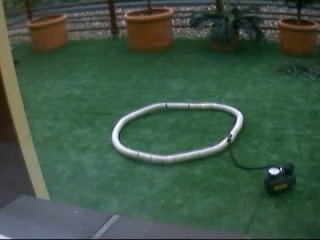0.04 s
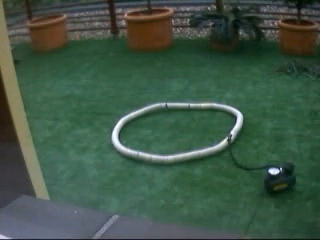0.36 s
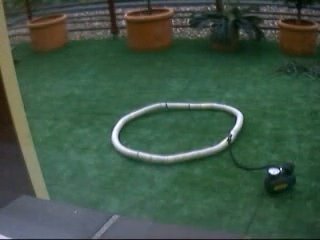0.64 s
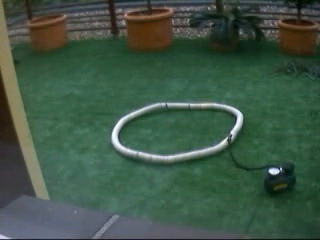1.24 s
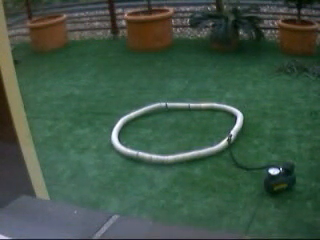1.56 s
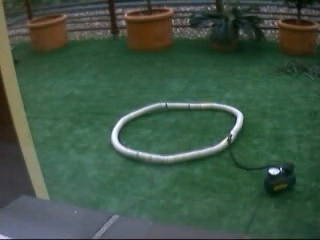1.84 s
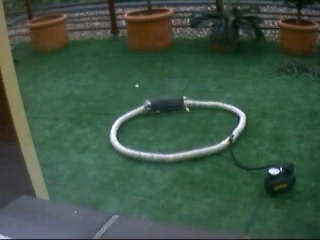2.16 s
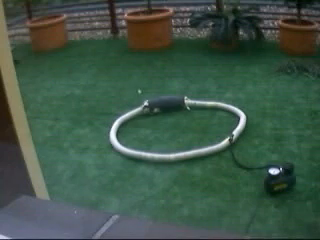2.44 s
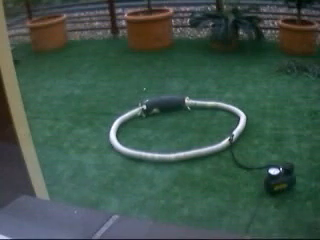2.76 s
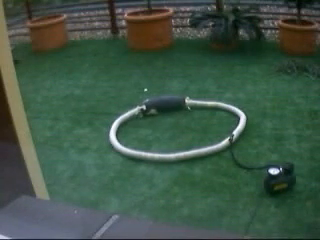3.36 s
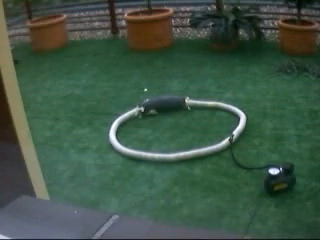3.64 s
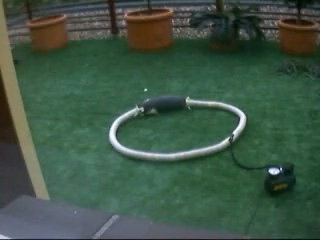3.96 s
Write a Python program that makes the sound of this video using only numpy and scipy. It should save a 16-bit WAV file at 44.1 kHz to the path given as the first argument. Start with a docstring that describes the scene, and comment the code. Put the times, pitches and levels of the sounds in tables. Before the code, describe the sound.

Small compressor whirring steadily, one sharp bang of a bursting tube, then briefly switched off and on.

```python
"""Inner tube pumped to bursting

A small piston compressor rattles on the floor, its gears whining and its valve ringing at each stroke.
The taped inner tube it is pumping up bursts: a pressure pulse, a scattered blast and a low boom, which
overload the microphone. Scraps of tape tick down. The motor is switched off, coasts to rest and is
switched on again, its stroke rate and gear pitch following its speed. Mains hum lies under it all."""
import sys
import numpy as np
from scipy import signal
from scipy.fft import rfft, irfft
from scipy.io import wavfile

SR = 44100
rng = np.random.default_rng(int(sys.argv[2]) if len(sys.argv) > 2 else 0)


def materialize(psi):
    """Save the field psi as 16-bit PCM at rate SR to the path in sys.argv[1].

    A 1-D psi becomes a single channel; in a 2-D psi each row is a channel.
    """
    bounded = np.clip(np.atleast_2d(psi).T, -1, 1)
    quanta = np.round(bounded * 32767).astype(np.int16)
    wavfile.write(sys.argv[1], SR, quanta)


N = 176400
T = np.arange(N) / SR
HZ = np.fft.rfftfreq(N, 1 / SR)

# motor speed: time_s, strokes_per_s
MOTOR_SPEED = [(0, 40.26), (2.03, 40.26), (2.15, 41.4), (2.32, 42.7), (2.5, 41.6), (2.63, 41.3),
               (2.8, 30.5), (2.89, 22.6), (2.98, 17), (3.12, 0), (3.232, 0), (3.25, 22.3), (3.28, 23),
               (3.33, 27), (3.4, 37), (3.52, 41.3), (3.73, 41.9), (4, 41.9)]
# strength of the rattle: time_s, gain_db, treble_gain_db
RATTLE_GAIN = [(0, -0.5, 0.5), (2.0, -0.5, 0), (2.6, 0, 0), (2.72, -1.5, -3.5), (2.85, -4, -5),
               (2.95, -5.5, -9), (3.03, -5.5, -13), (3.07, -14.5, -22), (3.22, -22.5, -35),
               (3.25, -13, -20), (3.315, -16, -20), (3.35, -3, -7.5), (3.43, -1, -0.5), (3.55, -0.5, 0.5),
               (4, -1, .3)]
# broad spectrum of the rattle: frequency_hz, relative_db
RATTLE_SPECTRUM = [(88, -52), (150, -13.5), (351, -21.5), (371, -25), (507, -17), (682, -17.5), (762, -17),
                   (1120, -6), (1190, -10.5), (2140, -10.5), (2580, -4.5), (2770, -4.5), (5490, -29),
                   (12400, -29), (16100, -66), (22000, -120)]
# housing resonances: centre_hz, width_hz, boost_db
HOUSING_MODES = [(524.5, 29, 5.5), (604, 28, 6.5), (689.3, 23, 10.5), (1008, 31, 7.5), (1105.5, 57, 6.5),
                 (1290, 48, 10), (1366, 25, 6), (1573, 35, 3), (1790, 70, 5), (1970, 150, 2.5),
                 (2284, 30, 3), (2500, 35, 4.5), (2892, 41, 9), (3226, 115, 10), (4200, 300, 4),
                 (5086, 350, 6)]
# rattle bands, each swelling once a turn: low_hz, high_hz, angle_turns, swell_db, gain_db, loose_share
RATTLE_BANDS = [(171.4, 900, 0.46, 4.5, -.5, .3), (900, 1500, .17, 3, -3.5, .3),
                (1501, 2350, .33, 5, 0, .3), (2352, 3500, .22, 2, -3.8, .3), (3498, 6000, .2, 2, -1.5, .35),
                (5980, 13000, 0.089, .6, -.5, .8)]
# strength of the gear whine: time_s, gain_db
GEAR_GAIN = [(0, -38), (2.6, -38), (2.68, -33), (2.84, -32), (2.96, -34), (3.04, -44), (3.12, -70),
             (3.23, -70), (3.25, -48), (3.32, -50), (3.42, -34), (3.55, -38)]
# strength of the valve's ring: time_s, gain_db
VALVE_GAIN = [(0, -1.5), (.5, -1), (2.05, -1), (2.17, 5), (2.28, -10), (2.38, -6.5), (2.51, 4.5), (2.61, 2),
              (2.64, -40), (3.33, -40), (3.39, -7), (3.47, -5), (3.56, 3), (4, 5)]
# mains hum: harmonic_number, level_db
HUM_HARMONICS = [(1, -38), (2, -49), (3, -58), (4, -52), (7, -58)]
# background hiss: frequency_hz, relative_db
HISS_SPECTRUM = [(20, -8), (70, -4), (130, -3), (260, 2), (600, -3), (1200, -7), (1800, -13), (3000, -16),
                 (5000, -21), (10000, -25), (12400, -36)]
# spectrum of the blast: frequency_hz, relative_db
BLAST_SPECTRUM = [(30, -22), (85, -5), (140, -6), (250, -2), (340, -4), (550, -11), (1050, -2), (2000, -6),
                  (3200, -6), (5000, -22), (12000, -31)]
# reverberation time of the blast: frequency_hz, t60_s
BLAST_DECAY = [(60, 0.38), (250, .36), (500, 0.21), (1100, 0.21), (3000, 0.17), (10000, 0.12)]
# modes that boom after the burst: pitch_hz, level_db, t60_s
BOOM_MODES = [(93, -11, .36), (212, -4, .2), (238, -2, .24), (1009, -12, .2), (1322, -14, 0.13)]
# scraps of tape landing: start_s, level_db
SCRAP_LANDINGS = [(2.157, -35), (2.224, -34), (2.295, -27), (2.307, -29)]
# spectrum of a landing: frequency_hz, relative_db
SCRAP_SPECTRUM = [(2000, -23), (5500, -14), (7200, 4), (8500, -3), (12000, -12)]
# brief rings of the compressor's case: peak_s, pitch_hz, level_db
CASE_RINGS = [(2.32, 595, -30), (2.66, 4400, -33), (3.405, 595, -29), (3.415, 4420, -33)]
# clicks of the switch: start_s, level_db
SWITCH_CLICKS = [(2.797, -18), (3.2315, -21.5), (3.314, -36)]
# spectrum of a click: frequency_hz, relative_db
CLICK_SPECTRUM = [(500, -13), (2300, -14), (3200, 11.5), (4400, -15), (5700, -9), (7800, -22), (9500, -15),
                  (12000, -24)]

RUNNING_SPEED = MOTOR_SPEED[0][1]


def amp(db):
    """Decibels to amplitude ratio."""
    return 10 ** (np.asarray(db) / 20)


def unit(x):
    """Normalisation to rms 1."""
    return x / np.sqrt(np.mean(x ** 2) + 1e-20)


def curve(rows, at, column=1):
    """Linear interpolation of a table column over time."""
    rows = np.array(rows)
    return np.interp(at, rows[:, 0], rows[:, column])


def log_curve(rows, hz):
    """Interpolation of a table on a log-frequency axis."""
    f, value = np.transpose(rows)
    return np.interp(np.log(hz + 1), np.log(f + 1), value)


def noise(spectrum):
    """White noise filtered to a spectrum, rms 1."""
    return unit(irfft(rfft(rng.standard_normal(N)) * amp(log_curve(spectrum, HZ)), N))


def drift(rate_hz):
    """Low-pass random fluctuation, rms 1."""
    return unit(irfft(rfft(rng.standard_normal(N)) * np.exp(-(HZ / rate_hz) ** 2), N))


def crank_turns(rest_s=3.2, stroke_times_s=(2.0105, 3.76)):
    """Crank angle is the integral of a slightly wobbling speed; each whole turn is a compression."""
    speed = np.maximum(curve(MOTOR_SPEED, T), .01) * (1 + .0026 * drift(rate_hz=14))
    turns = np.cumsum(speed) / SR
    # one compression time sets the phase before the rest, the other after it
    before, after = np.interp(stroke_times_s, T, turns)
    return turns - before + (T > rest_s) * ((before - after) % 1)


def rattle(turns, level_db=-22.7, treble_hz=3400):
    """Forced vibration: gears and piston drive the housing modes with a periodic, partly loose clatter."""
    orders = np.arange(8193)
    one_turn = irfft(np.exp(2j * np.pi * rng.random(len(orders))) * (orders > 2) * (orders < 330))
    clatter = unit(np.interp(turns % 1, np.linspace(0, 1, len(one_turn)), one_turn))
    periodic = rfft(clatter * np.clip(curve(MOTOR_SPEED, T) / RUNNING_SPEED, 0, 1))
    loose = rfft(unit(rng.standard_normal(N) * amp(3.2 * drift(rate_hz=600))))
    modes_db = sum(db / (1 + (2 * (HZ - hz) / width) ** 2) for hz, width, db in HOUSING_MODES)
    response = unit(amp(log_curve(RATTLE_SPECTRUM, HZ))) * amp(modes_db)
    out = np.zeros(N)
    for low, high, angle, swell_db, gain_db, loose_share in RATTLE_BANDS:
        drive = np.sqrt(1 - loose_share) * periodic + np.sqrt(loose_share) * loose
        band = irfft(drive * response * (HZ >= low) * (HZ < high), N)
        push = np.exp(3 * (np.cos(2 * np.pi * (turns - angle)) - 1))
        stroke_db = swell_db * (push - push.mean()) * (1 + .35 * drift(rate_hz=27))
        envelope_db = curve(RATTLE_GAIN, T, column=2 if low > treble_hz else 1)
        out += band * amp(gain_db + envelope_db + stroke_db + .8 * drift(rate_hz=12))
    return amp(level_db) * out


def gear_whine(turns, teeth=57, resonance_hz=1290, half_width_hz=45):
    """The tooth-meshing frequency follows the speed; the tone flares as it crosses a housing resonance."""
    mesh_hz = teeth * curve(MOTOR_SPEED, T)
    flare_db = 12 / (1 + ((mesh_hz - resonance_hz) / half_width_hz) ** 2)
    envelope = amp(curve(GEAR_GAIN, T) + flare_db + 4.5 * drift(rate_hz=45))
    return envelope * np.sin(2 * np.pi * teeth * turns + 1.1 * drift(rate_hz=90))


def valve(turns, base_hz=2628, hz_per_speed=10, width_s=.0056):
    """Each compression excites the valve's resonance: a tone pulse, slightly higher at higher speed."""
    out = np.zeros(N)
    strokes = T[1:][np.diff(np.floor(turns)) > 0]
    for s, (size, phase, detune) in zip(strokes, rng.standard_normal((len(strokes), 3))):
        near = slice(max(int(s * SR) - 900, 0), int(s * SR) + 900)
        t = T[near] - s
        envelope = amp(-14.2 + curve(VALVE_GAIN, s) + 1.7 * size) * np.exp(-(t / width_s) ** 2)
        hz = (base_hz + hz_per_speed * (curve(MOTOR_SPEED, s) - RUNNING_SPEED)) * (1 + .005 * detune)
        out[near] += envelope * np.sin(2 * np.pi * hz * t + .35 * phase)
    return out


def hum_and_hiss(mains_hz=49.95, hiss_db=-41):
    """Harmonics of the mains frequency stand over a broadband noise floor."""
    hum = sum(amp(db) * np.sqrt(2) * np.sin(2 * np.pi * (k * mains_hz * T + rng.random()))
              for k, db in HUM_HARMONICS)
    return hum + amp(hiss_db) * noise(HISS_SPECTRUM)


def tube_burst(start_s=2.0135, pop_hz=1250, pop_s=.001, delay_s=.003, rise_s=.003):
    """Sudden pressure release radiates a pulse; reverberation from the walls and a damped boom follow."""
    t = np.maximum(T - start_s, 0)
    late = np.maximum(t - delay_s, 0)
    pop = amp(-.5) * (t / pop_s) ** 2 * np.exp(2 - 2 * t / pop_s) * np.sin(2 * np.pi * pop_hz * t)
    hz, frame_s, frames = signal.stft(noise(BLAST_SPECTRUM), SR, nperseg=512)
    decay = amp(-60 * np.maximum(frame_s - start_s, 0) / log_curve(BLAST_DECAY, hz)[:, None])
    scattered = signal.istft(frames * decay, SR, nperseg=512)[1][:N]
    blast = amp(-3) * scattered * (1 - np.exp(-late / rise_s))
    boom = sum(amp(db - 60 * late / t60) * np.sin(2 * np.pi * f * late) for f, db, t60 in BOOM_MODES)
    return pop + blast + boom


def impacts(events, spectrum, decay_s, room_db, room_s):
    """A short impact is broadband: its noise decays exponentially, with a slower tail from the room."""
    envelope = np.zeros(N)
    for start_s, db in events:
        t = abs(T - start_s)
        envelope += amp(db) * (T >= start_s) * (np.exp(-t / decay_s) + amp(room_db) * np.exp(-t / room_s))
    return envelope * noise(spectrum)


def tape_scraps():
    """Light scraps of tape land with impacts heard mostly in the high treble."""
    return impacts(SCRAP_LANDINGS, SCRAP_SPECTRUM, decay_s=.004, room_db=-16, room_s=.02)


def case_rings(width_s=.018):
    """Resonances of the case swell and fade briefly at set moments while the speed is changing."""
    return sum(amp(db) * np.exp(-((T - s) / width_s) ** 2) * np.sin(2 * np.pi * hz * T)
               for s, hz, db in CASE_RINGS)


def switch_clicks():
    """The switch snaps over in heavily damped impacts."""
    return impacts(SWITCH_CLICKS, CLICK_SPECTRUM, decay_s=.0016, room_db=-13, room_s=.014)


def scene():
    """Superposition of all the sources in one channel."""
    turns = crank_turns()
    snaps = tape_scraps() + switch_clicks()
    compressor = rattle(turns) + gear_whine(turns) + valve(turns) + case_rings()
    return (compressor + tube_burst() + snaps + hum_and_hiss())[None]


def record(dry, dip_hz=11050, low_cut_hz=38, high_cut_hz=12580):
    """Digital sampling leaves a narrow treble dip; the bang clips, and deep bass and top are cut."""
    dip = amp(-12 / (1 + ((HZ - dip_hz) / 260) ** 2))
    clipped = np.clip(irfft(rfft(dry) * dip, N), -1, 1)
    bass_cut = irfft(rfft(clipped) * (1 - np.exp(-(HZ / low_cut_hz) ** 4)), N)
    low_pass = signal.firwin(511, high_cut_hz, window=("kaiser", 7), fs=SR)
    return signal.oaconvolve(bass_cut, low_pass[None], "same")


dry = scene()
out = record(dry)
materialize(out)
```